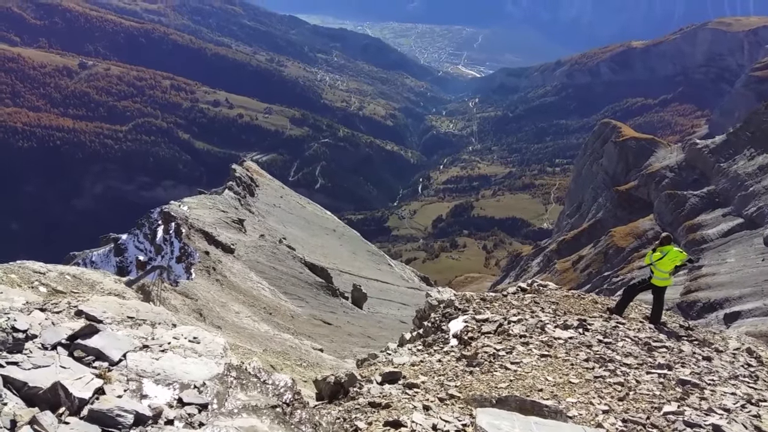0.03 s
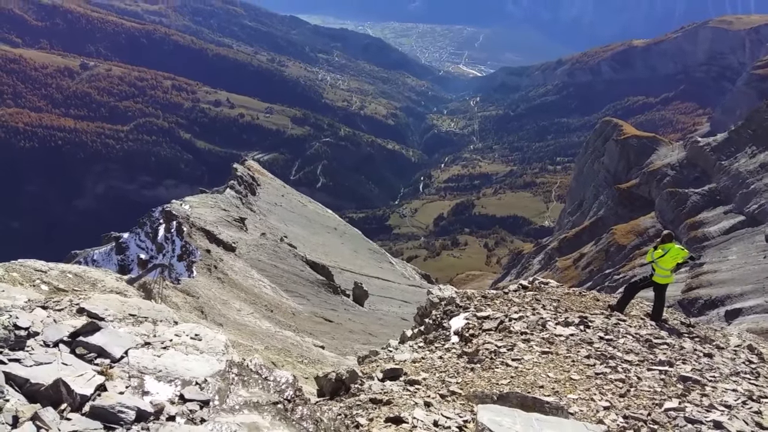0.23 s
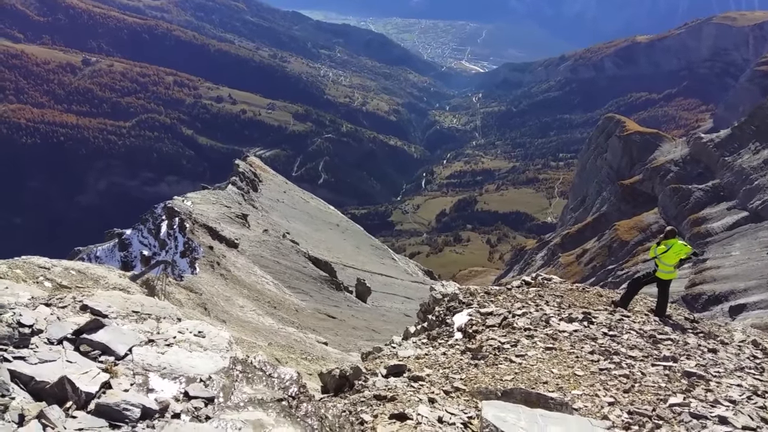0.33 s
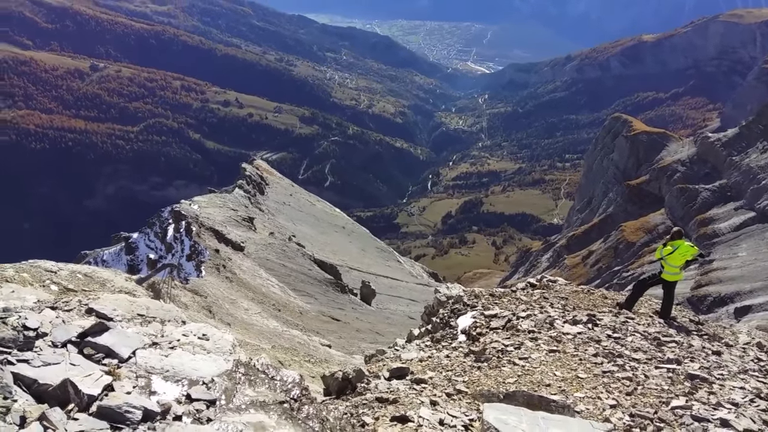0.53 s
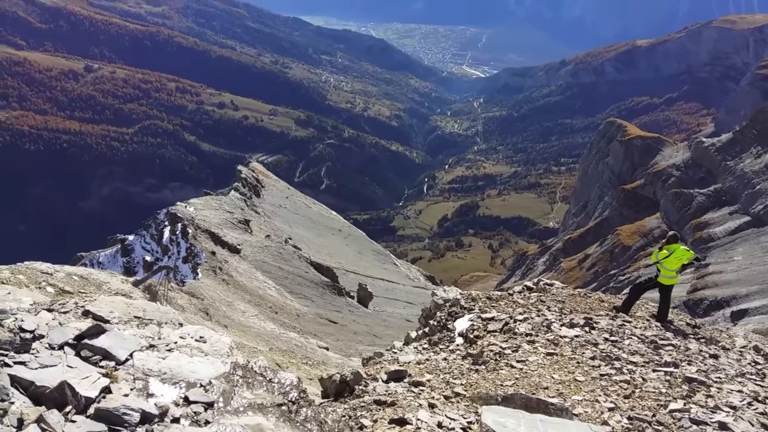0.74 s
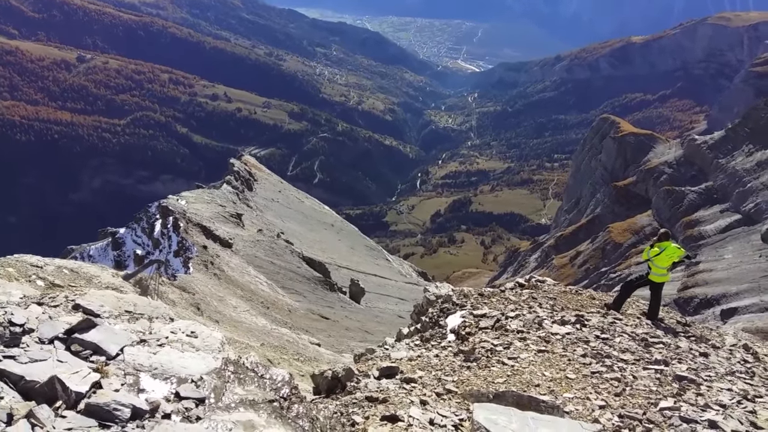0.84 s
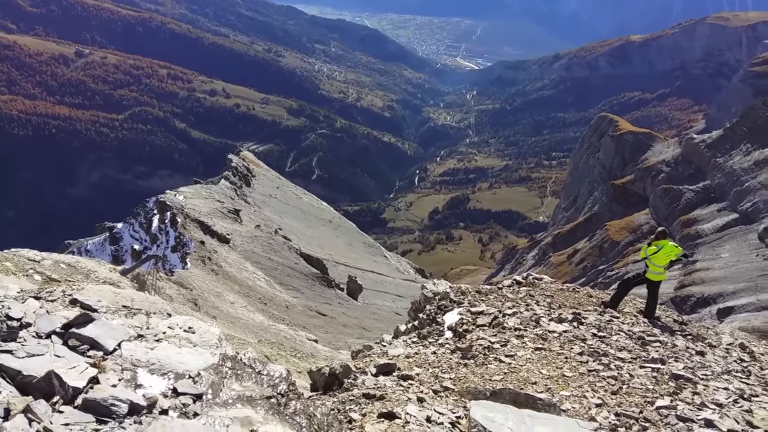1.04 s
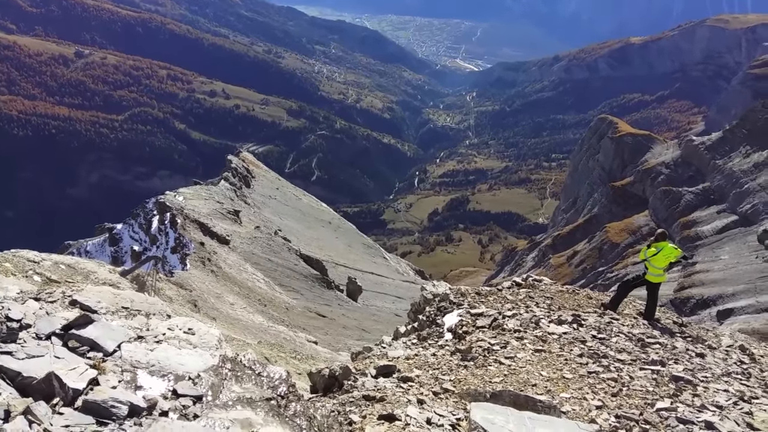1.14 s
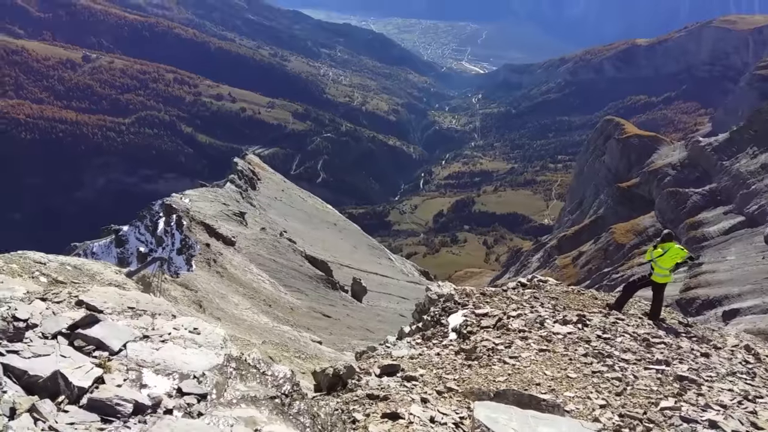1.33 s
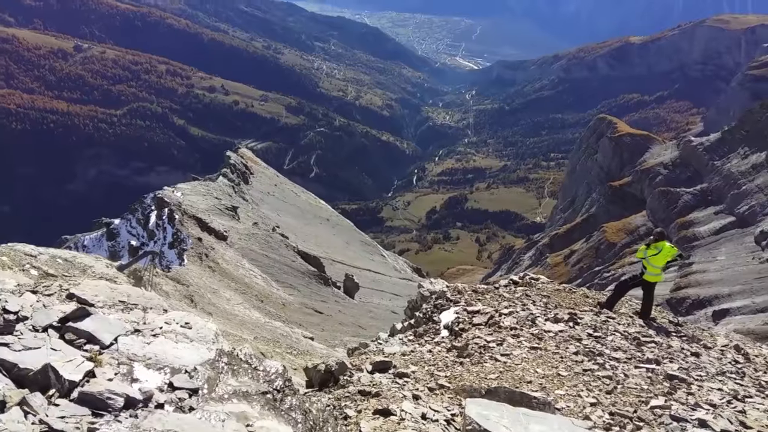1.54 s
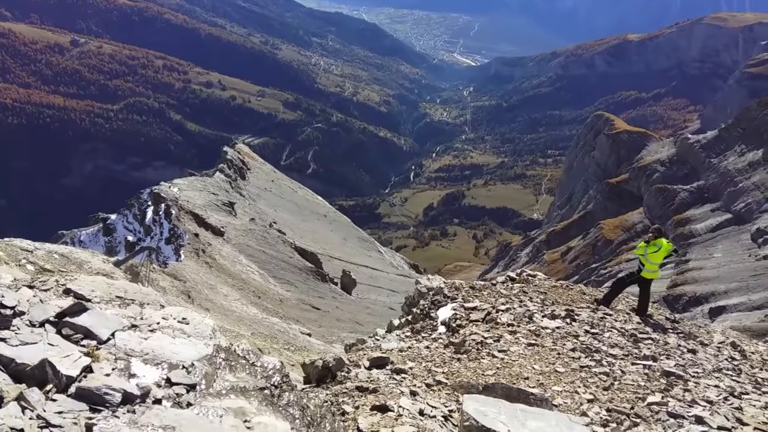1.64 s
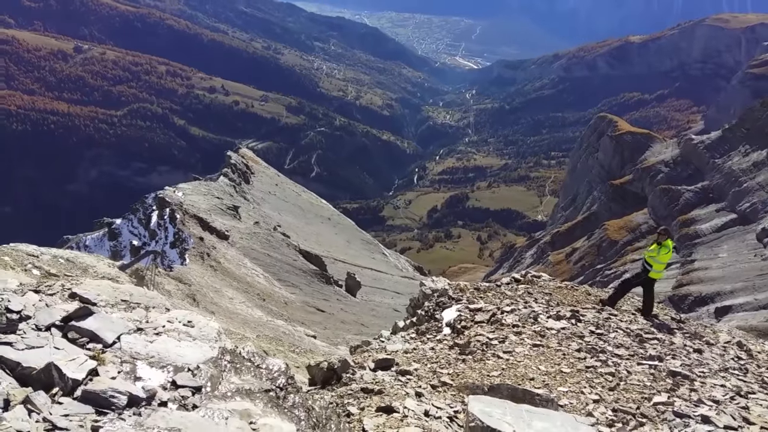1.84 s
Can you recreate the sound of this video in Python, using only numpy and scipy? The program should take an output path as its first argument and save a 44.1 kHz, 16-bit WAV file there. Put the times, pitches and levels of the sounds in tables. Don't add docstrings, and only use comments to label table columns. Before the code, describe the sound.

Very quiet mountain air with a faint whine until 0.2 s, when a gas blast hits: a sharp shock and a 0.04 s burst of clipped roar. The small stereo microphones choke, pop and drop out until about 0.5 s, the right more. Rolling boom and low thumps continue, with crackling rock echoes and distinct slaps near 1.2 and 1.4 s, fading duller towards 1.9 s.

```python
import sys
import numpy as np
from scipy import signal
from scipy.fft import rfft, irfft, next_fast_len
from scipy.io import wavfile
from scipy.ndimage import uniform_filter1d, map_coordinates

SR = 44100
rng = np.random.default_rng(int(sys.argv[2]) if len(sys.argv) > 2 else 0)


def linear_from_db(decibels):
    return 10 ** (np.asarray(decibels, float) / 20)


def master_out(mix):
    frames = np.transpose(np.atleast_2d(mix))
    ceiling = np.clip(frames, -1, 1)
    pcm = np.round(ceiling * 32767).astype(np.int16)
    wavfile.write(sys.argv[1], SR, pcm)


N = 83790
TIME_S = np.arange(N) / SR

BLAST_S, BLAST_LENGTH_S = .2038, .0395
RAIL = .86
ECHO_LAG_S = 0.00028

# pitch_hz, level_db
STILL_COLOUR = [(30, -33.5), (80, 0.5), (180, -11), (500, -21.5), (1200, -26.5), (2300, -20.5),
                (3200, -36.5), (8000, -46.5)]
# time_s, boom_db, crackle_over_boom_db, air_loss_at_2khz_db
ECHOES = [(.27, -13, -7.5, 1.5), (.35, -10, -12.5, 1.5), (.42, -16.5, -12.5, 0), (.46, -15.5, -14, 3),
          (.52, -16.5, -14, 2.5), (.62, -16.5, -14, 2.5), (.74, -18, -7.5, 2), (0.819, -15, -9.5, 2),
          (.9, -20.5, -5.5, 2.5), (1.02, -20.5, -11, 3), (1.139, -21, -5, 4.5), (1.259, -24.5, 2, 7.5),
          (1.342, -27.5, -3.5, 7.5), (1.349, -24.5, 2, 6.5), (1.48, -22, -3.5, 9.5),
          (1.63, -28.5, -6, 11.5), (1.872, -32.5, -10, 12), (1.879, -30, 1, 11)]
# pitch_hz, level_db
BOOM_COLOUR = [(25, -16.5), (45, 7), (80, 12.5), (130, 6), (200, 6), (320, -3), (500, -27.5), (1100, -69.5)]
# time_s, peak_db, pitch_hz
THUMPS = [(.37, -8, 148), (.41, -24, 150), (.508, -11, 130), (.535, -13.5, 230), (.543, -8.5, 125),
          (.565, -11, 100), (.583, -11.5, 95), (.596, -8, 190), (.627, -9.5, 105), (.648, -11.5, 100),
          (.661, -11, 193), (.68, -16.5, 142), (.713, -5, 121), (.745, -17.5, 224), (.782, -4.5, 91.4),
          (.805, -12, 141.6), (.826, -9, 75), (.842, -12, 241), (.877, -19.5, 119), (1.008, -13, 131.4),
          (1.137, -11.5, 111.4), (1.155, -17, 107), (1.175, -24, 100), (1.412, -11.5, 110),
          (1.49, -13.5, 190), (1.508, -22, 162.4), (1.577, -20.5, 94.6), (1.61, -24, 223),
          (1.662, -23.5, 83), (1.76, -26.5, 103.6), (1.792, -24.5, 91), (1.846, -23, 101.5),
          (1.887, -18.5, 95)]
# pitch_hz, level_db
ROCK_COLOUR = [(150, -13.5), (350, 4), (700, 4), (1200, -4), (1900, -5), (2700, -11.5), (7200, -27),
               (10500, -100)]
# time_s, peak_db
SLAPS = [(0.847, -30), (0.901, -35), (1.171, -8.5), (1.177, -23), (1.211, -21), (1.226, -17),
         (1.246, -14.5), (1.351, -18.5), (1.358, -18), (1.388, -15), (1.404, -16), (1.4086, -5),
         (1.4186, -3.5), (1.459, -3.5), (1.466, -10), (1.512, -21)]
# width_ms, level_db
SLAP_PARTS = [
    (1.09, -7),
    (0.23, -6.5),
    (0.065, -26),
]
# time_s, peak_db, pitch_hz
GULLY_RINGS = [(1.158, -20.5, 850), (1.172, -19, 750), (1.19, -24, 750), (1.206, -19, 780),
               (1.221, -13.5, 820), (1.245, -14.5, 680), (1.256, -14.5, 590), (1.269, -22, 650),
               (1.282, -21, 700), (1.295, -14.5, 680), (1.31, -21, 544), (1.325, -25, 513),
               (1.368, -24, 700), (1.381, -15, 620)]
# pitch_hz, level_db
FLAME_COLOUR = [(150, -40), (450, -1.5), (1100, -2), (1900, -4), (3500, -16.5), (8000, -27.5), (16000, -31)]
# pitch_hz, width_hz, lift_db
PORTS = [
    (1697, 917, 9),
    (4570, 1600, 10),
]
# pitch_hz, level_db
RIGHT_SHADE = [(400, 0), (1200, 1), (3000, -2.5), (8000, -16.5)]
# pitch_hz, likeness (1 = same)
ALIKE = [(100, 1), (600, 0.96), (1500, 0.36), (4000, 0.033)]
# pitch_hz, resonance (Q)
LOW_CUT = [(53, 3), (81, 1.5), (157, .82)]
# start_s, length_s, swell_size, swell_rise_ms
PINNED_LEFT = [(.2137, .0035, -.6, 1), (.2285, .0025, .8, 1), (.2345, .0045, .9, 2),
               (.2424, .0311, -2.3, 5.5), (.2775, .0025, -.5, 1), (.2815, .002, .3, 1),
               (.297, .005, -.4, 3), (.313, .002, -.4, 1), (.3315, .004, -.5, 2), (.3866, .003, -.5, 2),
               (.4172, .0135, -1.2, 3), (.447, .0085, -.5, 3)]
PINNED_RIGHT = [
    (.2051, .0064, -1.9, 1),
    (.2152, .0026, .4, 1),
    (.229, .0022, 1.1, 1),
    (.2345, .0045, .8, 2),
    (.2412, .1815, -3.1, 6.5),
    (.4229, .0803, .62, .6),
]
PINNED_BOTH = [(0.5498, 0.005, -0.44, 1.6), (0.5877, 0.0016, -0.2, 2), (0.597, 0.0096, -0.098, 4.4),
               (0.6704, 0.0012, 0.42, 1.7), (0.6996, 0.0075, 0.29, 2), (0.715, 0.0031, -1.6, 4.7),
               (0.762, 0.0093, -0.7, 6.9), (0.787, 0.0076, -0.51, 1), (0.805, 0.0025, -0.17, 2),
               (0.8226, 0.0053, 0.16, 4), (1.1387, 0.0043, -0.068, 1.3)]
# time_s, size, length_ms
SNAPS = [
    (0.308, 1.307, 0.23),
]
# time_s, size, width_ms
JERKS = [
    (.2746, .6, .3),
    (.2763, -.55, .09),
    (.281, -.3, .08),
    (.285, -.55, .1),
    (.289, -.4, .12),
    (.2934, -.4, .2),
]


def unit(x):
    return x / np.sqrt(np.mean(x ** 2) + 1e-20)


def along(points, hz):
    f, v = np.transpose(points)
    return np.interp(np.log(hz + 1), np.log(f + 1), v)


def filtered(x, response):
    m = next_fast_len(N + SR)
    return irfft(rfft(x, m) * response(np.fft.rfftfreq(m, 1 / SR)), m)[..., :N]


def low_cut(hz):
    stages = []
    for cut_hz, q in LOW_CUT:
        r = hz / cut_hz
        stages.append(-r ** 2 / (1 + 1j * r / q - r ** 2))
    return np.prod(stages, axis=0)


def upright(x):
    return filtered(x, lambda hz: np.exp(-1j * np.angle(low_cut(hz))))


def pair(sources, colour, lag_s):
    def mix(hz):
        turn = np.arccos(np.clip(along(ALIKE, hz), -1, 1)) / 2
        return linear_from_db(along(colour, hz)) * [np.cos(turn), np.sin(turn)]

    mid, side = filtered(sources, mix)
    ears = np.array([mid + side, mid - side])
    ears = filtered(ears, lambda hz: np.exp(-1j * np.pi * lag_s * np.outer([1, -1], hz)))
    return filtered(unit(ears), lambda hz: (hz > 18) / np.maximum(abs(low_cut(hz)), .03))


def wobble(rate):
    knots = rng.standard_normal(int(N * rate / SR) + 4)
    return map_coordinates(knots, [np.arange(N) * rate / SR])


def echo_levels():
    at_s, boom_db, crackle_db, _ = np.transpose(ECHOES)
    return np.interp(TIME_S, at_s, boom_db), np.interp(TIME_S, at_s, crackle_db)


def bursts(rows, cycles):
    t = TIME_S - np.array([[ECHO_LAG_S], [0]])
    total = 0
    for at_s, peak_db, pitch_hz in rows:
        swell = np.exp(-((t - at_s) * pitch_hz / cycles) ** 2 / 2)
        total = total + linear_from_db(peak_db) * swell * np.cos(2 * np.pi * pitch_hz * (t - at_s))
    return total


def air(x):
    hz, s, z = signal.stft(x, SR, nperseg=512)
    at_s, *_, loss_db = np.transpose(ECHOES)
    loss = np.outer((hz / 2000) ** 1.25, np.interp(s, at_s, loss_db))
    return signal.istft(z * linear_from_db(-loss), SR, nperseg=512)[1][:, :N]


def ports(x):
    lift = lambda hz: np.array([1 + (linear_from_db(db) - 1) / (1 + (2 * (hz - c) / w) ** 2) for c, w, db in PORTS])
    return filtered(x, lambda hz: lift(hz) * [hz * 0 + 1, linear_from_db(along(RIGHT_SHADE, hz))])


def stillness():
    whine = linear_from_db(-63 + 3) * np.sin(2 * np.pi * 1656 * TIME_S)
    breeze = linear_from_db(-57.5) * pair(rng.standard_normal((2, N)), STILL_COLOUR, 0)
    return (breeze + whine) * np.where(TIME_S < BLAST_S, 1, .03)


def rolling_boom():
    under_db, flutter_db, evenness = -1, .8, .75
    boom_db, _ = echo_levels()
    boom = pair(rng.standard_normal((2, N)), BOOM_COLOUR, ECHO_LAG_S)
    swing = uniform_filter1d(filtered(boom, low_cut)[0] ** 2, size=1300)
    boom = boom / (abs(swing) + .05) ** (evenness / 2)
    boom = linear_from_db(boom_db + under_db + flutter_db * wobble(25)) * boom
    return boom + upright(bursts(THUMPS, .8))


def rock_faces():
    faces_per_s, spread_db, flutter_db = 2500, -2, .8
    spray_db, spray_ms = 8.5, 4.25
    boom_db, crackle_db = echo_levels()
    hits = rng.random((2, N)) < faces_per_s / SR
    faces = hits * rng.standard_normal((2, N)) * linear_from_db(spread_db * rng.standard_normal((2, N)))
    spray = 1
    for at_s, peak_db in SLAPS:
        spray = spray + linear_from_db(peak_db + spray_db) * np.exp(-abs(TIME_S - at_s) * 1000 / spray_ms)
    level = linear_from_db(boom_db + crackle_db + flutter_db * wobble(60))
    return air(spray * level * pair(faces, ROCK_COLOUR, ECHO_LAG_S))


def cliffs():
    total = bursts(GULLY_RINGS, 1.13)
    for at_s, peak_db in SLAPS:
        for width_ms, part_db in SLAP_PARTS:
            u = (TIME_S - at_s - np.array([[ECHO_LAG_S], [0]])) * 1000 / width_ms
            total = total + linear_from_db(peak_db + part_db) * (1 - u ** 2) * np.exp(-u ** 2 / 2)
    return upright(total)


def valley():
    answer = rolling_boom() + ports(rock_faces() + cliffs())
    return answer * np.clip((TIME_S - BLAST_S - BLAST_LENGTH_S) / 0.024, 0, 1)


def blast():
    front_hz, front_db, drive_db = 1550, 4, -2
    right_late_s = .00022
    ears = []
    roar = pair(rng.standard_normal((2, N)), FLAME_COLOUR, -right_late_s)
    for ear, late_s in zip(roar, (0, right_late_s)):
        t = TIME_S - BLAST_S - late_s
        in_front = (t > 0) & (t * front_hz < 1.5)
        front = -linear_from_db(front_db) * np.sin(2 * np.pi * front_hz * t) * in_front
        burn = np.clip((t * front_hz - 1.5) * 2, 0, 1) * (t < BLAST_LENGTH_S)
        loud = front + linear_from_db(drive_db) * RAIL * ear * burn
        ears.append(loud / (1 + abs(loud / RAIL) ** 4) ** (1 / 4))
    return np.array(ears) * linear_from_db([[0], [-2.5]])


def scene():
    return stillness() + valley() + blast()


def held(x):
    fade = np.cos(np.linspace(0, np.pi / 2, SR // 2)) ** 2
    return np.concatenate([x, x[:, -1:] * fade], axis=1)


def pinned(x, spells):
    leak_db, leak_dies_ms, slow_hz = -19, 8, 220
    free, swell = np.ones(N), np.zeros(N)
    for start_s, length_s, push, rise_ms in spells:
        since_s = TIME_S - start_s
        inside = (since_s > 0) & (TIME_S < start_s + length_s)
        free[inside] = linear_from_db(leak_db) * np.exp(-since_s[inside] * 1000 / leak_dies_ms)
        rise = np.clip(since_s / (rise_ms / 1000) + .5, 0, 1)
        swell += push * np.sin(np.pi / 2 * rise) ** 2
    free = uniform_filter1d(free, size=27)
    slow = filtered(x, lambda hz: 1 / (1 + (hz / slow_hz) ** 4))
    slow_held = np.cumsum(np.diff(slow, prepend=0) * free)
    return slow_held + (x - slow) * free + swell


def snaps():
    return sum(size * (abs(TIME_S - at_s) < ms / 2000) for at_s, size, ms in SNAPS)


def jerks():
    return sum(size / (1 + ((TIME_S - at_s) * 1000 / ms) ** 2) for at_s, size, ms in JERKS)


def roll_off(x):
    return signal.sosfilt(signal.butter(12, 16800, fs=SR, output="sos"), x)


def record(dry):
    left = pinned(dry[0], [*PINNED_LEFT, *PINNED_BOTH]) + snaps()
    right = pinned(dry[1], [*PINNED_RIGHT, *PINNED_BOTH])
    x = filtered(held(np.array([left, right])), low_cut)
    x[0] += jerks()
    x = x / (1 + abs(x / 1.05) ** 6) ** (1 / 6)
    mix = filtered(held(x), lambda hz: 1 / (1 + (hz / 16300) ** 60))
    return roll_off(mix)


dry = scene()
out = record(dry)
master_out(out)
```